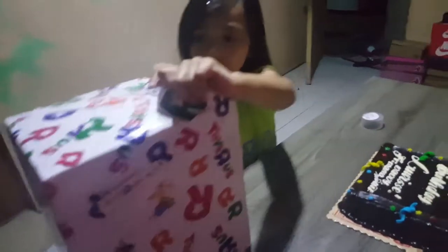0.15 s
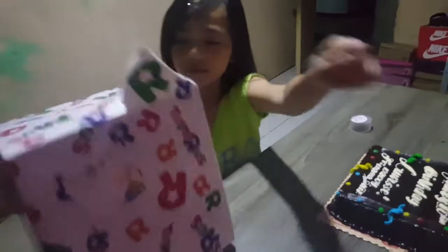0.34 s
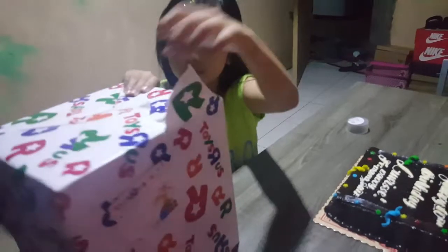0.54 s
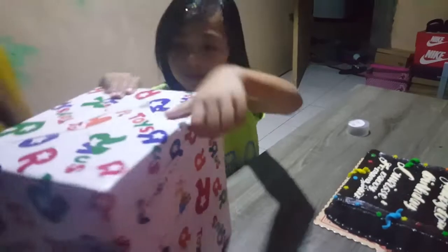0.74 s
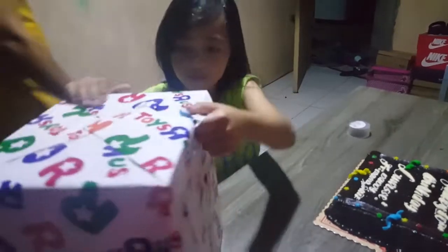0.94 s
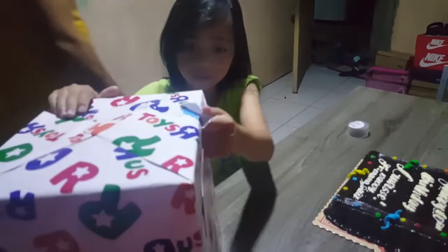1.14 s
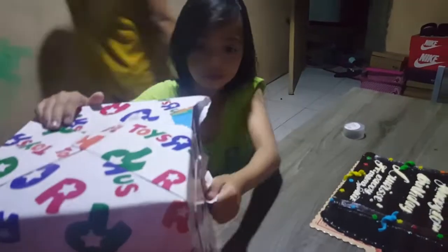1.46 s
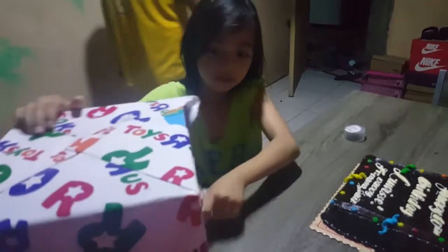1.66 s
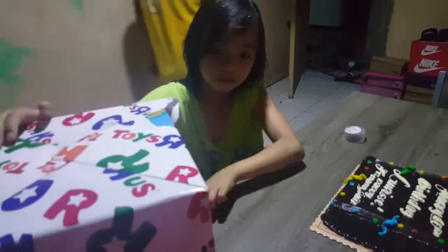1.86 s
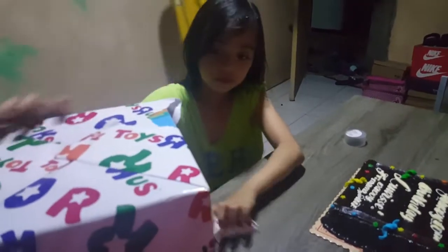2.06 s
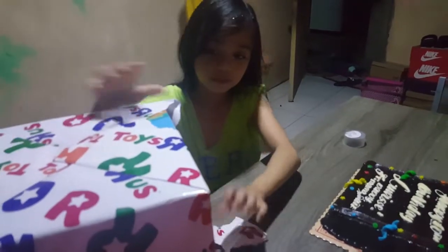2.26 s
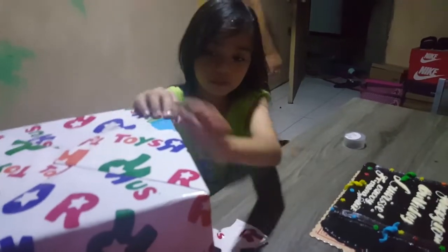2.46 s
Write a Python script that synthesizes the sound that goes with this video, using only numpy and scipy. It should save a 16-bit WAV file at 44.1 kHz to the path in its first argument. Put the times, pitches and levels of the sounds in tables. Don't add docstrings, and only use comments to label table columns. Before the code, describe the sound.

Wrapping paper tearing off a cardboard box, close up in a reverberant room. Light crinkles, then a loud snapping rip and hollow thumps at 0.2-0.35 s. The box judders and knocks softly until about 1 s. Total silence from 1.05 to 1.19 s. A second bright rip at 1.3-1.45 s ends in a boomy thump; hissing pulls at 1.6-1.9 s, box tap at 1.9, small crackle at 2.2, faint squeak at 2.34, weak tap at 2.5.

```python
import sys
import numpy as np
from scipy import signal
from scipy.fft import rfft, irfft, next_fast_len
from scipy.io import wavfile
from scipy.ndimage import map_coordinates

SR = 44100
rng = np.random.default_rng(int(sys.argv[2]) if len(sys.argv) > 2 else 0)


def field_ratio(decibels):
    return 10 ** (np.asarray(decibels, dtype=float) / 20)


def inscribe(sig):
    pcm = np.round(np.clip(np.atleast_2d(sig).T, -1, 1) * 32767)
    wavfile.write(sys.argv[1], SR, pcm.astype(np.int16))


N = 114660

# pitch in Hz, width in Hz, level in dB.
BOX_MODES = [(105, 39, -4), (156, 35, 0.5), (206, 65, -1.5), (300, 52.6, 0.5), (397, 110, -3.5),
             (557, 260, -5), (690, 390, -8.5)]
PAPER_RISE_S = 0.00024


def unit(x):
    return x / np.sqrt(np.mean(x ** 2) + 1e-20)


def along(points, hz):
    f, v = np.transpose(points)
    return np.interp(np.log(hz + 1), np.log(f + 1), v)


def wobble(rate):
    knots = rng.standard_normal(int(N * rate / SR) + 4)
    return map_coordinates(knots, [np.arange(N) * rate / SR])


def filtered(x, response):
    m = next_fast_len(N + SR // 2)
    return irfft(rfft(x, m) * response(np.fft.rfftfreq(m, 1 / SR)), m)[..., :N]


def colored(x, points):
    return filtered(x, lambda f: field_ratio(along(points, f)))


def resonances(modes):
    def response(f):
        total = 0
        for k, (hz, width, db) in enumerate(modes):
            ring = 1j * f * width / (hz * hz - f * f + 1j * f * width)
            total = total + (-1) ** k * field_ratio(db) * ring
        return total
    return response


def stroke(start, rise, hold, end):
    t = np.arange(N) / SR - start
    swell = np.clip(t / max(rise, 1e-3), 0, 1) ** 1.1
    return swell * field_ratio(-20 * np.clip(t - rise - hold, 0, None) / end)


def grains(s, hz, size, cycles, rise, count=400):
    t = np.arange(count) / SR
    hz = hz[:, None]
    decay = field_ratio(-30 * t * hz / cycles) * (1 - np.exp(-t / rise))
    rings = size[:, None] * np.sin(2 * np.pi * hz * t) * decay
    at = (s * SR).astype(int)[:, None] + np.arange(count)
    return np.bincount(at.ravel(), rings.ravel(), N + count)[:N]


def pair(x):
    # frequency in Hz, left-right likeness from -1 to 1.
    likeness = [(60, 0.86), (240, 1), (950, 0.37), (3770, -0.045), (15000, 0.19)]

    def mid_and_side(hz):
        angle = np.arccos(np.clip(along(likeness, hz), -1, 1)) / 2
        return np.array([np.cos(angle), np.sin(angle)])

    mid, side = filtered(x, mid_and_side)
    return np.array([mid + side, mid - side])


def placed(x, lead_s):
    ears = np.array([[1], [-1]])
    return filtered(x, lambda f: np.exp(1j * np.pi * f * lead_s * ears))


def background():
    # frequency in Hz, level in dB per Hz.
    noise_color = [(15, -49), (25, -18), (114, -2.5), (400, -10.5), (600, -13.5), (900, -16), (2700, -19),
                   (4000, -28.5), (16000, -50.5)]
    noise = unit(pair(colored(rng.standard_normal((2, N)), noise_color)))
    return field_ratio(-54) * noise * field_ratio(1.0 * wobble(8.2))


def room(x):
    # frequency in Hz, time to fall 60 dB in seconds.
    decay_times = [(100, 0.53), (500, 0.57), (2000, 0.42), (6000, 0.47), (14000, 0.33)]
    out, step = np.zeros((2, N + 2 * SR)), SR // 10
    delay = 130
    for start in range(0, N, step):
        hz, t, z = signal.stft(rng.standard_normal((2, SR // 2)), SR, nperseg=256)
        fading = z * field_ratio(-60 * t / along(decay_times, hz)[:, None])
        tail = signal.istft(fading, SR, nperseg=256)[1][:, :SR]
        tail = tail / np.linalg.norm(tail[0])
        wet = signal.fftconvolve(x[None, start:start + step], tail, axes=1)
        out[:, start + delay:start + delay + wet.shape[1]] += wet
    return pair(out[:, :N])


def box_drags():
    # start in seconds, rise in seconds, hold in seconds, judder level in dB, rattle level in dB.
    drags = [(-.05, 0.023, 0.051, -49, -45.5), (0.033, 0.012, 0.2, -51.5, -47),
             (0.229, 0.0079, 0.054, -43, -35.5), (0.307, 0.041, 0.11, -41.5, -31),
             (.43, 0.027, 0.13, -37, -54), (0.754, 0.0097, 0.1, -40.5, -48.5),
             (0.841, 0.052, 0.15, -38, -50), (1.091, 0.04, 0.085, -46.5, -57.5),
             (1.268, 0.085, 0.1, -50, -38.5), (1.46, 0.0046, 0.067, -59, -36), (1.65, 0.056, 0.1, -74, -48),
             (1.875, 0.0086, 0.042, -75, -40), (2.507, .005, 0.033, -53, -54.5)]
    judder_hz, judder_width_hz, jitter = 56.4, 43, 0.05
    phase = np.cumsum(judder_hz * (1 + jitter * wobble(30))) / SR
    slips = np.diff(np.floor(phase), prepend=0) * field_ratio(1.3 * wobble(36))
    bounce = resonances([(judder_hz, judder_width_hz, 0)])
    judder = unit(filtered(slips, lambda f: bounce(f) ** 2))
    lumpy_noise = rng.standard_normal(N) * field_ratio(5.04 * wobble(60))
    rattle = unit(filtered(lumpy_noise, resonances(BOX_MODES)))
    out = np.zeros(N)
    for start, rise, hold, judder_db, rattle_db in drags:
        mix = field_ratio(judder_db) * judder + field_ratio(rattle_db) * rattle
        out += stroke(start, rise, hold, 0.047) * mix
    return out


def box_knocks():
    # time in seconds, level in dB, contact length in seconds.
    knocks = [
        (0.377, -33, 0.00036),
        (0.451, -32, 0.00045),
        (2.509, -49.5, 0.000347),
    ]
    t = np.arange(N) / SR
    blows = sum(field_ratio(db) * np.exp(-((t - s) / contact) ** 2) for s, db, contact in knocks)
    return 5 * filtered(blows, resonances(BOX_MODES))


def box_thumps():
    # time in seconds, peak level in dB, pitch in Hz, ring length in cycles.
    thumps = [(.0755, -26, 400, 9.3), (0.138, -27.5, 350, 5), (0.148, -32.5, 400, 3),
              (.217, -16.5, 196.5, 3.4), (.245, -11.5, 250, 2.1), (.36, -27.5, 107, 10),
              (.415, -29.5, 105, 12.6), (0.424, -30.5, 175.3, 6.2), (.335, -29.5, 359, 8),
              (.372, -25.5, 643, 9.3), (.865, -35, 295, 11), (1.282, -38, 303, 6.3), (1.295, -35.5, 327, 9),
              (1.4496, -19, 110, 13), (1.4507, -14.5, 190.5, 3.4), (1.4531, -14, 295.6, 9.9),
              (1.453, -17, 645, 6), (1.47, -16.5, 124, 3.4), (1.477, -18, 416, 9.04),
              (1.878, -27.5, 555, 8.7), (1.8868, -27, 280, 4.8), (1.889, -24, 784, 9.1),
              (1.897, -32.5, 474, 6), (1.906, -30.5, 420, 7.5), (1.91, -32.5, 170, 3.6),
              (1.928, -39, 135, 4), (2.513, -42.5, 412, 11)]
    s, db, hz, cycles = np.transpose(thumps)
    return grains(s, hz, field_ratio(db), cycles[:, None], rise=0.0006, count=6000)


def squeak():
    # start in seconds, rise in seconds, hold in seconds, level in dB, pitch in Hz.
    fold_rub = (2.338, .02, .03, -53, 612)
    start, rise, hold, db, hz = fold_rub
    tone = np.sin(2 * np.pi * hz * np.arange(N) / SR + 0.4 * wobble(29.64))
    return field_ratio(db) * stroke(start, rise, hold, 0.054) * tone


def rubs():
    # start in seconds, hold in seconds, level in dB, pitch in Hz, width in Hz.
    patches = [(0.106, .08, -50.5, 2500, 300), (0.357, 0.14, -50, 3860, 300), (0.764, 0.25, -65, 9280, 902),
               (0.853, 0.047, -51.5, 1540, 300), (1.684, .12, -54.5, 9450, 2500),
               (2.222, 0.055, -50.5, 2980, 700), (2.213, 0.14, -55, 2510, 250), (2.44, .08, -67, 2660, 296),
               (.222, 0.058, -33, 4790, 3000), (1.385, .09, -33.5, 4250, 2200),
               (1.7, 0.14, -45.5, 4300, 1500), (1.7, 0.12, -53, 12980, 4000),
               (1.41, .07, -45.5, 12470, 4000)]
    out = np.zeros((2, N))
    for start, hold, db, hz, width in patches:
        ring = resonances([(hz, width, 0)])
        band = unit(filtered(rng.standard_normal((2, N)), lambda f: ring(f) ** 2))
        out += field_ratio(db + 1.7 * wobble(150)) * stroke(start, 0.01, hold, 0.087) * band
    return pair(out)


def snaps():
    # time in seconds, peak in dB, pitch in Hz, crack against ring in dB, ring length in cycles.
    creases = [(0.0141, -28, 1500, -11, 6.2), (0.0677, -23, 2830, -2.5, 12), (.0695, -24, 3280, -4.5, 11),
               (.085, -28, 3640, -8.5, 10), (0.1106, -27.5, 2436, -10.5, 40),
               (0.1143, -23.5, 2413, -12, 27), (0.158, -31.5, 2470, -8, 46), (0.2166, -5, 2980, 5, 7.6),
               (0.2228, -2, 1680, -16, 7), (0.2339, -11, 1780, -16.5, 5.2), (.259, -3, 2600, -13, 9.6),
               (0.2791, -12, 1790, -14, 11), (.292, -16.5, 2000, -10.5, 15),
               (0.327, -15.5, 2780, -15.5, 15), (0.8244, -35, 1570, -7.5, 5.9),
               (.9765, -32.5, 2070, 1.5, 4.5), (1.2541, -28, 5200, 7.5, 4.5), (1.263, -19, 1400, -7.5, 5.6),
               (1.2632, -33.5, 2270, -6.5, 6.6), (1.2837, -27, 6000, 4.5, 5), (1.2931, -30.5, 3000, 7, 5),
               (1.2965, -29, 2500, 7, 5), (1.3025, -27, 4500, 10, 5), (1.311, -31, 3200, -1.5, 8),
               (1.3265, -10.5, 1800, -9, 5.1), (1.3323, -13.5, 3770, 1, 7.3),
               (1.3318, -14.5, 1760, -8, 8.5), (1.363, -18, 3620, -7, 9.6), (1.394, 1, 4660, -8, 8.4),
               (1.409, -3.5, 3510, -11, 12), (1.439, -10.5, 3300, -11.5, 10),
               (1.7575, -24, 2700, -10.5, 11), (2.2081, -22, 2560, -11, 15.4),
               (2.2094, -23.5, 4620, -9, 18), (2.213, -29.5, 3000, -5.5, 22), (2.215, -38, 1350, -10, 16),
               (2.231, -34, 2420, -7, 20), (2.51, -42.5, 2600, 3.5, 4.4)]
    # frequency in Hz, level in dB per Hz.
    crack_color = [(500, -29), (1000, -14.5), (2500, -3), (5000, 1), (10000, -17), (16000, -13)]
    s, db, hz, crack_db, cycles = np.transpose(creases)
    bursts = sum(field_ratio(level) * stroke(t, 0, 0.00034, 0.0035) for t, level in zip(s, db + crack_db))
    crack = colored(rng.standard_normal(N) * bursts, crack_color)
    return grains(s, hz, field_ratio(db), cycles[:, None], PAPER_RISE_S, count=2000) + crack


def paper_crackle():
    # frequency in Hz, level in dB per Hz.
    sheet_color = [(500, -27.5), (1150, -21), (1600, 2), (2000, -2.5), (2800, 4.5), (4000, 0.5),
                   (7000, -14.5), (16000, -47.5)]
    count = int(2500 * N / SR)
    hz = np.clip(2600 * np.exp(0.35 * rng.standard_normal(count)), 1450, 12000)
    size = field_ratio(5 * np.minimum(rng.exponential(size=count), 3))
    rings = grains(rng.uniform(0, N / SR, count), hz, size, 7, PAPER_RISE_S)
    ticks = rng.standard_normal(N) * (rng.random(N) < 0.05)
    sheet = colored(ticks, sheet_color)
    return unit((unit(rings) + field_ratio(-4.5) * unit(sheet)) * field_ratio(0.5 * wobble(120)))


def paper_hiss():
    # frequency in Hz, level in dB per Hz.
    hiss_color = [(180, -34.5), (300, -2.5), (565, 2.5), (614, 0.5), (2360, -8.5), (4230, -2.5),
                  (6200, -3.5), (9710, -8.5), (16000, -11)]
    return unit(colored(rng.standard_normal(N) * field_ratio(4.0 * wobble(200)), hiss_color))


def paper():
    # start in seconds, rise in seconds, hold in seconds, crackle level in dB, hiss level in dB.
    pulls = [(-.05, 0.01, 0.053, -45, -48), (0.056, 0.0018, .13, -46.5, -46),
             (0.217, 0.005, 0.028, -21.5, -28), (0.259, 0.013, 0.039, -29, -41),
             (0.324, 0.023, 0.073, -38, -53.5), (0.465, 0.022, 0.13, -56.5, -60.5),
             (0.654, 0.13, 0.14, -57, -56.5), (0.799, 0.068, 0.1, -58, -64.5),
             (0.968, .004, 0.19, -54.5, -53), (1.139, 0.021, 0.052, -56.5, -53.5),
             (1.249, 0.0044, 0.069, -52, -49), (1.324, 0.0019, 0.023, -28.5, -36),
             (1.349, 0.021, 0.073, -30.5, -29.5), (1.471, .01, 0.035, -41.5, -53),
             (1.602, 0.068, 0.064, -44.5, -41.5), (1.722, 0.031, 0.091, -40.5, -39.5),
             (1.861, 0.013, 0.061, -46, -51), (1.96, 0.015, 0.17, -57.5, -64),
             (2.172, 0.0063, 0.016, -71, -59.5), (2.202, 0.0027, 0.037, -49, -55),
             (2.509, 0.0027, 0.078, -65.5, -69.5)]
    crackle, hiss = paper_crackle(), paper_hiss()
    out = np.zeros(N)
    for start, rise, hold, crackle_db, hiss_db in pulls:
        mix = field_ratio(crackle_db) * crackle + field_ratio(hiss_db) * hiss
        out += stroke(start, rise, hold, 0.018) * mix
    return out


def scene():
    sheet, creases = paper(), snaps()
    carton = box_drags() + box_knocks() + box_thumps()
    direct = placed(sheet + carton, 0.0002434) + placed(creases + squeak(), 0.0001)
    wet = field_ratio(2.5) * sheet + field_ratio(-5.5) * creases + field_ratio(-7) * carton
    wet = filtered(wet, lambda f: 1 / (1 + (90 / (f + 1)) ** 4))
    return direct + room(wet) + background() + rubs()


def roll_off(x):
    return signal.sosfilt(signal.butter(12, 16700, fs=SR, output="sos"), x)


def record(dry):
    # pitch in Hz, width in Hz, lift in dB.
    port_lifts = [(4540, 610, 0.5), (9440, 1000, 6)]
    # frequency in Hz, left minus right in dB.
    side_balance = [(60, -2), (240, -3), (950, -1.5), (3770, -8.5), (15000, -3)]
    low_hz, top_hz = 33, 15900
    gap_start_s, gap_end_s = 1.0535, 1.192

    def microphones(f):
        lift = sum(db * np.exp(-((f - hz) / width) ** 2) for hz, width, db in port_lifts)
        balance = along(side_balance, f) / 2 * np.array([[1], [-1]])
        return field_ratio(lift + balance) * (f < top_hz) / (1 + (low_hz / (f + 1)) ** 4)

    x = np.clip(filtered(dry, microphones), -0.9, 0.9)
    t = np.arange(N) / SR
    sounding = (t < gap_start_s) | (t > gap_end_s)
    return roll_off(x * sounding)


dry = scene()
out = record(dry)
inscribe(out)
```